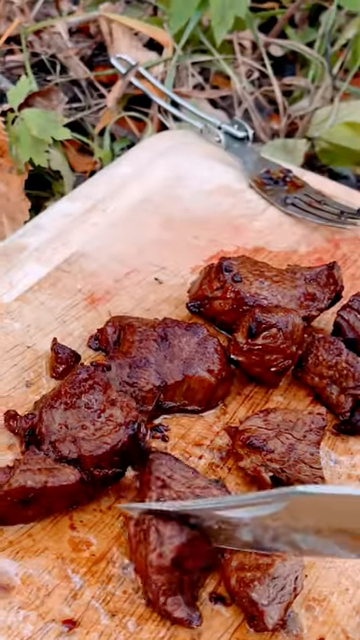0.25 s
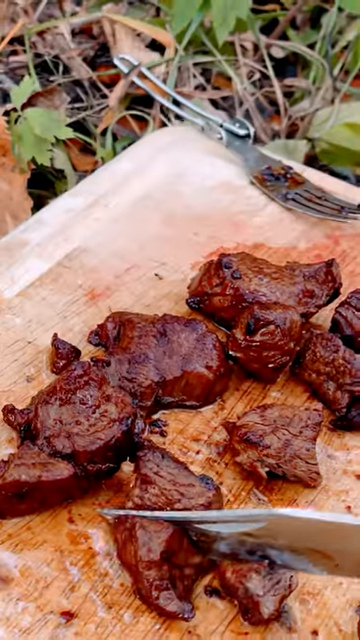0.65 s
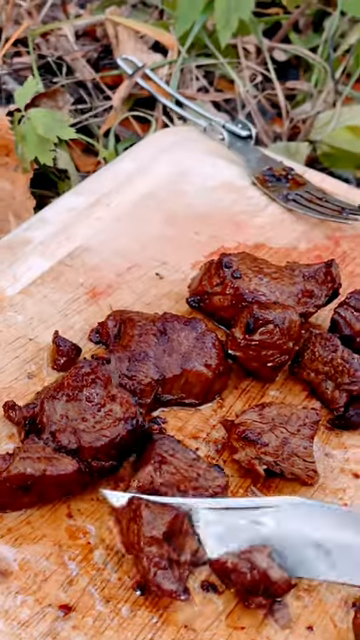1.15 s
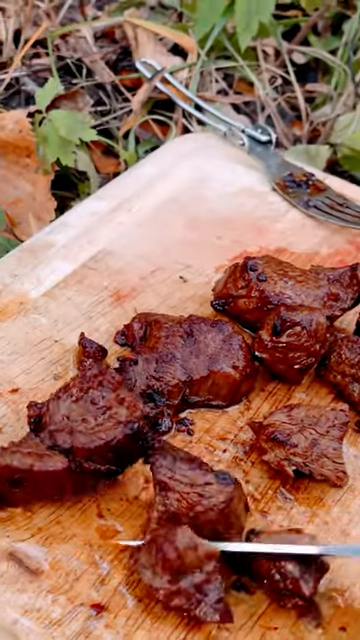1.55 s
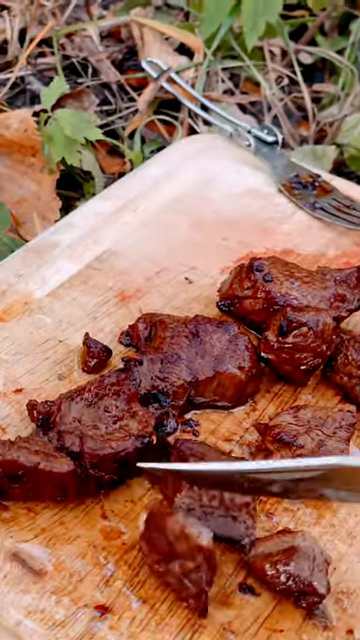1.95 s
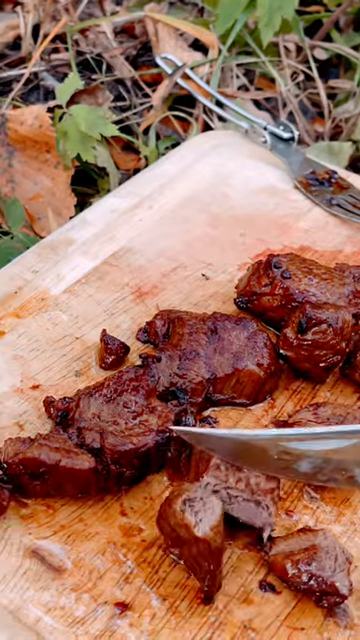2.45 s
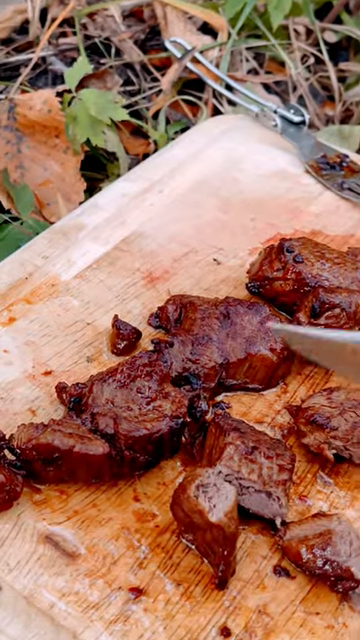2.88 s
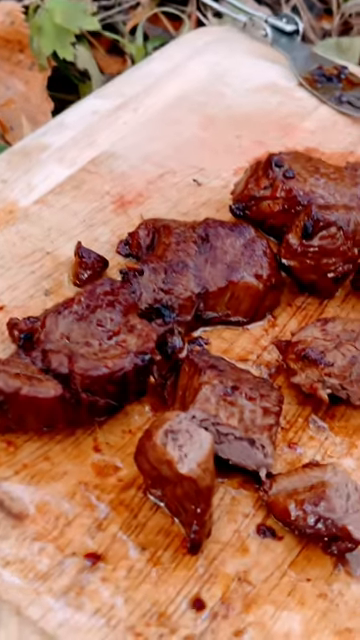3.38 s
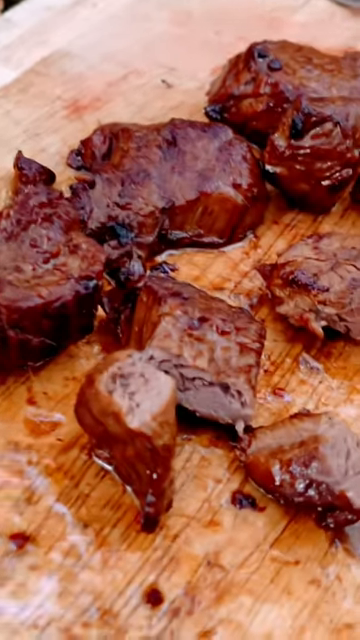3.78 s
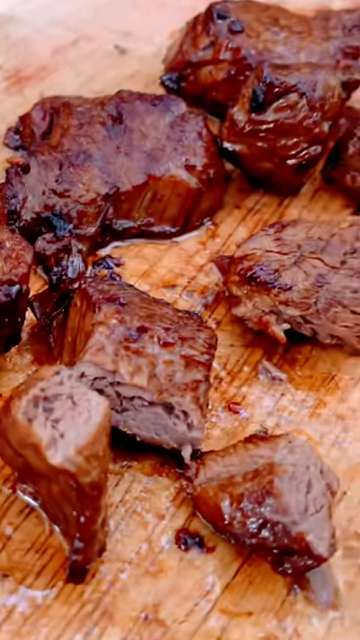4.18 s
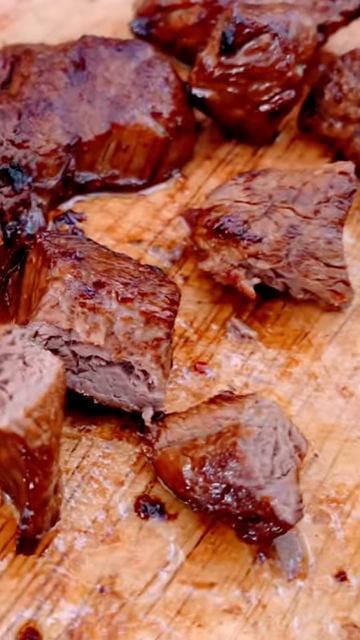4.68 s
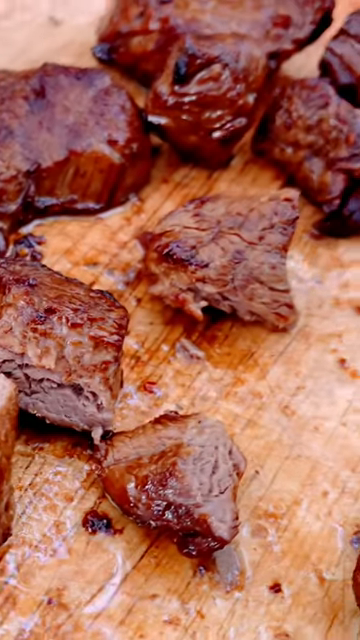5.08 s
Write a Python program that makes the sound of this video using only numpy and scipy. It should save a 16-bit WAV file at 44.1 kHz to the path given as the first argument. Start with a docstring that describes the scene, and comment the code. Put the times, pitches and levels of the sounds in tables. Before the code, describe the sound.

Outdoors, a knife ticks through the crust of fried meat, stutters against a wooden board with a short dull knock, and smears softly through in four even strokes. After a quiet gap, dry leaves slide, then crunch and crackle much louder as someone leans in, with sharp twig snaps to the end. Close stereo microphone, open air, no echo, faint distant motor hum.

```python
"""Outdoors, a knife saws through fried meat on a wooden board in four even strokes: the crust ticks, the blade smears through and knocks on the wood.
Then someone leans in closer: dry leaves rustle, crunch and crackle as the weight grows, and twigs go on snapping while it settles.
A distant motor hums over the faint hiss of the air."""
import sys
import numpy as np
from scipy import signal
from scipy.fft import rfft, irfft, next_fast_len
from scipy.io import wavfile
from scipy.ndimage import uniform_filter1d, map_coordinates

SR = 44100
rng = np.random.default_rng(int(sys.argv[2]) if len(sys.argv) > 2 else 0)


def materialize(psi):
    """Save the field psi as 16-bit PCM at rate SR to the path in sys.argv[1].

    A 1-D psi becomes a single channel; in a 2-D psi each row is a channel.
    """
    bounded = np.clip(np.atleast_2d(psi).T, -1, 1)
    quanta = np.round(bounded * 32767).astype(np.int16)
    wavfile.write(sys.argv[1], SR, quanta)


N = 235185

# blade breaking the crust: (s, peak dB, pitch Hz, low edge Hz)
CRUST_TICKS = [(0.162, -53, 8500, 1490), (0.170, -57.5, 9100, 2500), (0.429, -57, 9000, 2470), (0.514, -53, 5700, 4070), (0.535, -56, 3860, 1300), (0.5433, -48, 7460, 4000),
               (0.623, -64, 8750, 6000), (0.752, -67, 8600, 4480), (0.9586, -47, 6700, 2600), (1.532, -59.5, 3520, 2480), (1.565, -53.5, 4200, 3000), (1.691, -65, 2700, 2400)]
# blade meeting the board: (s, level dB, contact pitch Hz)
KNOCKS = [(0.515, -38.5, 1270), (0.533, -43, 1500), (0.545, -29.5, 670), (0.5506, -38, 2450), (0.5525, -32.5, 714), (0.556, -43, 2270), (0.558, -47, 2370), (0.56, -23.5, 450),
          (0.801, -39.5, 685), (0.810, -45.5, 330), (0.875, -49.5, 2150), (0.9576, -48, 1850), (1.532, -52, 1970), (1.566, -49, 1800), (1.733, -47, 1280)]
# board with the blade on it: (Hz, dB, t60 s)
BOARD = [(221, 4, 0.025), (412, -1.5, 0.044), (530, 4.5, 0.016), (720, -10, 0.027), (887, 1.5, 0.036), (1140, -14, 0.024), (1520, -1.5, 0.015), (1824, -9, 0.038), (2566, -7, 0.062)]
# leaves and twigs snapping, thin ones with no low part: (s, peak dB, pitch Hz, low edge Hz, hollow low ring dB)
SNAPS = [(3.373, -45, 6200, 4600, -75), (3.6828, -27.5, 10600, 4300, -71), (3.715, -32, 5440, 2000, -54), (3.7304, -35, 5640, 1980, -35),
         (3.7737, -28, 6740, 5500, -51), (3.7963, -29, 11000, 7000, -37.5), (3.8093, -26, 7600, 1500, -32), (3.851, -42, 2460, 1200, -39.5), (3.8726, -33.5, 6700, 2500, -57),
         (3.896, -40.5, 4200, 1600, -40), (3.9331, -42, 10700, 1600, -42.5), (3.9519, -38.5, 9700, 1800, -54), (3.9825, -29, 8000, 1800, -30),
         (4.0262, -34.5, 3760, 2980, -60), (4.0617, -33, 5400, 2000, -49), (4.073, -36.5, 3900, 1800, -43.5), (4.1318, -35, 10800, 1500, -43), (4.152, -28, 7500, 1500, -38.5),
         (4.2438, -37, 4800, 2200, -62), (4.2847, -24, 6700, 2800, -43), (4.313, -49, 7400, 1300, -62), (4.334, -33.5, 2850, 2900, -54.5),
         (4.3905, -38.5, 10100, 6000, -72), (4.4324, -44.5, 1550, 1300, -49), (4.4567, -35.5, 11500, 3300, -45), (4.519, -33.5, 6900, 2000, -45.5), (4.612, -42, 4300, 2200, -51.5),
         (4.65, -22.5, 6160, 5230, -41), (4.7097, -46, 11000, 4600, -80), (4.748, -41.5, 5000, 3300, -77), (4.7726, -35.5, 10300, 4170, -74),
         (4.8187, -36.5, 10000, 3500, -73), (4.835, -26, 7900, 5900, -61), (4.8426, -24.5, 11000, 4200, -39), (4.853, -31, 11000, 4500, -70), (4.8662, -25.5, 8000, 5400, -43.5),
         (4.9369, -30.5, 10800, 3850, -45.5), (4.99, -45, 9200, 5400, -73), (4.9989, -35, 7860, 6540, -62), (5.015, -38.5, 11000, 2280, -62), (5.066, -42, 9600, 2800, -56),
         (5.086, -47, 2220, 1700, -60), (5.1135, -39, 3920, 1500, -60), (5.119, -32, 2090, 1470, -46), (5.1419, -20, 7000, 3320, -49), (5.1517, -30, 8440, 3980, -43),
         (5.1696, -25.5, 8200, 1800, -25.5), (5.2138, -38, 7940, 3800, -65), (5.227, -28, 5030, 4550, -47.5), (5.2984, -44.5, 7940, 2800, -52)]
# hollow ring of the leaf bed: (Hz, dB, t60 s)
LEAF_BED = [(396, 0.5, 0.033), (613, 4, 0.06), (892, 13.5, 0.023), (1071, 7.5, 0.037), (1286, 11, 0.029), (2060, -7.5, 0.065)]
# weight pressing on the leaves: (s, dB below the hardest press)
PRESSING = [(3.25, -33.5), (3.45, -29.5), (3.58, -15), (3.67, -8), (3.72, -5), (3.81, -5), (3.885, -15), (3.91, -12), (4.2, -13), (4.29, -8), (4.36, -25), (4.46, -17), (4.512, -22.5), (4.525, -7), (4.57, -24), (5.33, -23.5)]
# colours: (Hz, dB per Hz)
SNAP_COLOUR = [(500, -16), (1500, 3), (2300, -0.5), (3200, -6), (4200, -4), (5200, 0.5), (6800, -1.5), (9000, -1), (9900, -4.5), (10600, 5), (11600, -2.5), (13300, -24), (15000, -26)]
SMEAR_COLOUR = [(300, 5), (900, 9), (2000, 10), (3000, 2), (4000, -5.5), (5500, 3), (8000, -3), (11000, 6.5), (12500, -22), (16000, -103)]
CRACKLE_COLOUR = [(900, 7), (2500, -2.5), (4100, -3), (5200, -0.5), (6800, -3.5), (9000, -0.5), (9900, 0), (10600, 1.5), (11600, 0), (12800, -26), (16000, -72)]
AIR_COLOUR = [(20, -30), (45, -1), (72, 4), (110, 4), (170, -4.5), (260, -7), (450, -20), (1000, -24.5), (1700, -21), (3200, -24), (4100, -17.5), (4800, -23), (5600, -18), (7300, -26), (9500, -25.5), (10200, -55), (12000, -36.5), (16000, -90)]
# distant motor: (Hz, dB)
HUM = [(130, -60), (260.5, -77.5)]
CUTOFF_HZ = 16500  # fixed
TIME = np.arange(N) / SR
CRUNCH_COLOUR = [(200, 2), (400, -12), (600, -3.5), (920, 5), (1300, 0), (1700, -23.5), (4000, -26)]
# sound from the ground bends round the recorder: (Hz, radians by which the left port lags)
PORT_PHASE = [(260, 0.37), (520, 2.06), (860, 2.38), (1380, 2.95), (2150, 5.08), (3360, 4.17), (4300, 7.75), (6600, 11.77), (8000, 20.46), (8900, 20), (10500, 21.77), (11700, 25), (12700, 25.3)]
# leaves rubbing: (Hz, width Hz, dB)
RUBBING = [(1284, 180, 1.5), (1790, 870, 5.5), (2800, 1050, 4.5), (4200, 3400, 3.5)]
# tiny flakes of crust: how many, peak and pitch (lowest, highest)
CRUMB_COUNT, CRUMB_DB, CRUMB_HZ = 60, (-72, -62), (2800, 11000)  # fixed
# the blade saws to and fro at an even pace; each stroke swells to its middle and fades
FIRST_STROKE_S, STROKE_PERIOD_S, STROKE_FADE_DB_PER_S = 0.554, 0.324, 65
STROKE_DB = [-50, -50.5, -53, -52]  # level at the middle of each stroke
BLADE_IN_S, BLADE_OUT_S, DRAG_DB = 0.59, 1.75, -66  # light steady drag while the blade is in the meat
SNAP_RISE_S, SNAP_DECAY_S, SNAP_TAIL_DB = 0.0007, 0.001, -17  # fixed
# lesser snaps come at random once the weight is down, with peak and pitch in a range (lowest, highest)
SMALL_SNAPS_FROM_S, SMALL_SNAPS_PER_S = 3.7, 55  # fixed
SMALL_SNAP_DB, SMALL_SNAP_HZ = (-61.5, -31), (1800, 11000)  # at the hardest press
SMALL_SNAP_FOLLOWS = 0.36  # dB gained per dB of weight
SMALL_LOW_EDGE = 0.4  # their low edge, as a share of the pitch
SMALL_HOLLOW_DB = -20.5  # their hollow ring, relative to the crack
WEIGHT_DOWN_S = 3.6
# each sound of the leaves: (level at the hardest press dB, dB gained per dB of weight); rubbing needs the least weight
CRUNCH_LAW, RUSTLE_LAW, CRACKLE_LAW = (-56.5, 1), (-46.5, 0.97), (-37, 0.98)
# loose leaves slide before they are pinned down: (middle s, half length s, level dB)
SLIDE_S, SLIDE_WIDTH_S, SLIDE_DB = 3.508, 0.15, -55.5
# tough fibres catching on the blade: (middle s, half length s, level dB)
RASPS = [(0.875, 0.011, -59.5), (1.063, 0.014, -61.5), (1.144, 0.03, -61), (1.229, 0.026, -51), (1.29, 0.017, -61)]
# ring of those catches: (Hz, width Hz, dB)
RASP_RING = [(5400, 1050, 2.5), (7040, 600, 1), (9200, 770, 3), (11000, 300, 0)]
# thin whistle, perhaps a small bird: (middle s, half length s, pitch Hz, fall Hz per s, peak dB)
WHISTLE = (5.096, 0.016, 8800, 32000, -54)  # fixed


def from_db(db):
    """Decibels to gain."""
    return 10 ** (np.asarray(db) / 20)


def rms_one(x):
    """Scale to unit power."""
    return x / np.sqrt(np.mean(x ** 2) + 1e-20)




def drift(rate):
    """Slow chance with spread 1."""
    knots = rng.standard_normal(4000)
    return np.interp(TIME * rate, np.arange(len(knots)), knots)


def colour(x, points):
    """Causal (minimum-phase) filter that follows a spectrum, with unit gain for white noise."""
    size = 2 * next_fast_len(N // 2 + 4096)  # fixed
    hz, db = np.transpose(points)
    gain = rms_one(from_db(np.interp(np.log(np.fft.rfftfreq(size, 1 / SR) + 1), np.log(hz), db)))
    cepstrum = irfft(np.log(gain))
    cepstrum[1:size // 2] *= 2
    cepstrum[size // 2 + 1:] = 0
    return irfft(rfft(x, size) * np.exp(rfft(cepstrum)))[..., :N]


def resonate(x, hz, width_hz):
    """One resonance with gain 1 on top."""
    r = np.exp(-np.pi * width_hz / SR)
    return signal.lfilter(np.array([1, 0, -1]) * (1 - r * r) / 2, [1, -2 * r * np.cos(2 * np.pi * hz / SR), r * r], x + 1e-18)


def add(out, s, sound):
    """Mix a sound in at a time."""
    i = int(s * SR)
    out[..., i:i + sound.shape[-1]] += sound[..., :N - i]


def two_ports(x, lag_ms, pan_db):
    """Sound reaches the right port first and the left one a little later."""
    left, right = np.broadcast_to(x, (2, N))
    late = map_coordinates(left, [np.arange(N) - lag_ms * SR / 1000], order=3)  # fixed
    return np.array([late * from_db(pan_db / 2), right * from_db(-pan_db / 2)])


def pair(alike, size):
    """Two white noises with a shared part."""
    mid, side = rng.standard_normal((2, size))
    alike = np.clip(alike, 0, 1)
    return (np.sqrt(1 + alike) * mid + np.sqrt(1 - alike) * side * [[1], [-1]]) / np.sqrt(2)


def fracture(hz, edge_hz, peak_s, rise_s, decay_s, tail_db, tail_s, ring_db, width_hz):
    """A crack gathers in uneven slips, peaks, rings the broken piece and scatters off things nearby."""
    t = TIME[:2048] - peak_s
    after = np.maximum(t, 0)
    shape = np.exp(np.minimum(t, 0) / rise_s) * (np.exp(-after / decay_s) + from_db(tail_db) * np.exp(-after / tail_s))
    slips = from_db(2.5 * rng.standard_normal(len(t)))  # fixed
    burst = pair(.85, len(t)) * slips * shape  # fixed
    # each piece has a main mode and two weaker ones of its own
    others = np.minimum(hz * rng.uniform([.6, 1.1], [.85, 1.5]), 11500)  # fixed
    ring = resonate(burst, hz, width_hz) + .6 * sum(resonate(burst, f, width_hz) for f in others)  # fixed
    burst = signal.lfilter(*signal.butter(1, min(2 * hz, SR / 2.3), fs=SR), burst + from_db(ring_db) * ring)  # thick pieces break duller
    burst = signal.lfilter(*signal.butter(2, min(edge_hz, SR / 4), "high", fs=SR), burst)  # small ones radiate no lows
    return burst / np.sqrt(np.mean(burst ** 2) * t[-1] / decay_s)


def strike(modes, contact_hz, reach_octaves, detune, sag):
    """Damped modes of height about 1; those near the contact pitch are driven most, and start sharp while pressed."""
    t = TIME[:4096]
    hz, db, t60 = np.transpose(modes)[:, :, None]
    chance = rng.standard_normal((2, len(modes), 1))
    gain = from_db(db + 2 * chance[0]) / (1 + (np.log2(hz / contact_hz) / reach_octaves) ** 2)
    gain[::2] *= -1  # neighbouring modes swing against each other and merge into one thump
    turns = hz * (1 + detune * chance[1]) * np.cumsum(1 + sag * np.exp(-t / .003)) / SR  # fixed
    ring = np.sum(gain / np.linalg.norm(gain) * np.sin(2 * np.pi * turns) * np.exp(-np.log(1000) * t / t60), axis=0)
    ring = ring * (1 - np.exp(-2 * contact_hz * t))  # the contact takes half a cycle to build
    return signal.lfilter(*signal.butter(2, contact_hz / 2, "high", fs=SR), ring)


def grains(per_s, spread_db, low_hz, high_hz, sharpness):
    """Many tiny breaks of uneven size, each ringing briefly at a pitch of its own."""
    sizes = from_db(spread_db * np.minimum(rng.exponential(1, N), 4)) * rng.choice([-1, 1], N)
    clicks = sizes * (rng.random(N) < per_s * from_db(3 * drift(40)) / SR)
    dealt = rng.integers(0, 16, N)  # fixed
    pitches = np.geomspace(low_hz, min(high_hz, SR / 3), 16)  # fixed
    return rms_one(sum(resonate(clicks * (dealt == k), hz, hz / sharpness) for k, hz in enumerate(pitches)))


def knife():
    """The crust ticks and the wet fibres smear along the blade in small catches."""
    ticks = np.zeros((2, N))
    for s, db, hz, edge_hz in CRUST_TICKS + crumbs():
        tick = fracture(hz, edge_hz, peak_s=.001, rise_s=.0005, decay_s=.001, tail_db=-20, tail_s=.006, ring_db=12, width_hz=700)  # fixed
        add(ticks, s, from_db(db + 11) * tick)
    stroke = sawing() * from_db(2 * drift(60))  # fixed
    catches = grains(per_s=1200, spread_db=3.5, low_hz=4800, high_hz=10000, sharpness=10)  # fixed
    squelch = grains(per_s=350, spread_db=3, low_hz=800, high_hz=3500, sharpness=6)  # fixed
    smear = from_db(-9.0) * stroke * (catches + from_db(-11.0) * squelch + from_db(-1.0) * pair(0.15, N))
    return two_ports(colour(ticks + from_db(-3.5) * smear, SMEAR_COLOUR) + rasps(), lag_ms=0.2474, pan_db=3.0)


def board():
    """The blade breaks through and stutters on the wood; each contact is a gritty scuff and a short ring."""
    out = np.zeros(N)
    for s, db, contact_hz in KNOCKS:
        scuff = through(rng.standard_normal(4096), [(contact_hz, contact_hz * .45, 0)]) * np.exp(-TIME[:4096] / .003)  # fixed
        add(out, s, from_db(db - 2.5) * (strike(BOARD, contact_hz, reach_octaves=0.82, detune=0.042, sag=0.055) + .5 * scuff))
    return two_ports(out, lag_ms=0.061, pan_db=3.0)


def snaps():
    """Stiff leaves and twigs give way; the leaf bed answers with a short hollow ring."""
    cracks, hollow = np.zeros((2, N)), np.zeros(N)
    for s, db, hz, edge_hz, hollow_db in SNAPS + small_snaps():
        crack = fracture(hz, edge_hz, peak_s=0.0011, rise_s=SNAP_RISE_S, decay_s=SNAP_DECAY_S, tail_db=SNAP_TAIL_DB, tail_s=0.0066, ring_db=7.0, width_hz=140)
        add(cracks, s, from_db(db) * crack)
        add(hollow, s + 0.0011, from_db(hollow_db + 10.5) * strike(LEAF_BED, contact_hz=890, reach_octaves=1.0, detune=0.039, sag=0.11))
    return from_ground(colour(cracks, SNAP_COLOUR), pan_db=0.4) + from_ground(hollow, pan_db=-4.0)


def leaves():
    """Countless small breaks in clumps: a hollow crunch below, leaves rubbing, and fine crackle on top."""
    pinned = np.clip((TIME - SLIDE_S) / (WEIGHT_DOWN_S - SLIDE_S), 0, 1)  # sliding leaves do not crunch yet
    crunch_gain, crackle_gain = under_weight(CRUNCH_LAW) * pinned * clumps(), under_weight(CRACKLE_LAW) * clumps()
    rustle_gain = under_weight(RUSTLE_LAW) + from_db(SLIDE_DB) * np.exp(-((TIME - SLIDE_S) / SLIDE_WIDTH_S) ** 2)
    crunch = 1.25 * grains(per_s=260, spread_db=3, low_hz=480, high_hz=1400, sharpness=12) + .4 * pair(.5, N)  # fixed
    rub = .8 * grains(per_s=700, spread_db=3, low_hz=1200, high_hz=4500, sharpness=16) + .75 * pair(.2, N)  # fixed
    fine = .9 * grains(per_s=1400, spread_db=3, low_hz=2600, high_hz=12000, sharpness=20) + .55 * pair(.3, N)  # fixed
    dull = crunch_gain * from_db(3.5) * colour(crunch, CRUNCH_COLOUR)
    around = two_ports(rustle_gain * through(rub, RUBBING), lag_ms=0.11, pan_db=1.0)  # the rubbing comes from all round
    bright = crackle_gain * colour(fine, CRACKLE_COLOUR)
    return around + from_ground(dull, pan_db=-5.0) + from_ground(bright, pan_db=-0.5)


def outdoors():
    """Low rumble alike at both ports, thin hiss unlike, and a wavering far motor."""
    lows = signal.sosfilt(signal.butter(2, 350, fs=SR, output="sos"), pair(.88, N))  # fixed
    highs = signal.sosfilt(signal.butter(2, 350, "high", fs=SR, output="sos"), pair(0.015, N))
    air = from_db(-60.5) * colour(lows + highs, AIR_COLOUR)
    turns = np.cumsum(1 + 0.0056 * drift(5.0)) / SR
    hum = sum(from_db(db + 1.84 * drift(14)) * np.sqrt(2) * np.sin(2 * np.pi * hz * turns) for hz, db in HUM)
    return air + two_ports(hum, lag_ms=0.51, pan_db=1.0)


def from_ground(x, pan_db):
    """Off to one side, each pitch reaches the two ports with its own phase."""
    size = 2 * next_fast_len(N // 2 + 4096)  # fixed
    left, right = np.broadcast_to(x, (2, N))
    phase = np.interp(np.fft.rfftfreq(size, 1 / SR), *np.transpose(PORT_PHASE))
    late = irfft(rfft(left, size) * np.exp(-1j * phase))[:N]
    return np.array([late * from_db(pan_db / 2), right * from_db(-pan_db / 2)])


def sawing():
    """Gain of the blade's rub: even strokes over a light drag."""
    middles = FIRST_STROKE_S + STROKE_PERIOD_S * np.arange(len(STROKE_DB))
    strokes = sum(from_db(db - STROKE_FADE_DB_PER_S * np.abs(TIME - s)) ** 2 for s, db in zip(middles, STROKE_DB))
    in_meat = uniform_filter1d(1.0 * ((TIME > BLADE_IN_S) & (TIME < BLADE_OUT_S)), size=4096)
    return np.sqrt(strokes + (from_db(DRAG_DB) * in_meat) ** 2)


def under_weight(law):
    """Gain of a sound that grows with the weight on the leaves."""
    full_db, follows = law
    return from_db(full_db + follows * np.interp(TIME, *np.transpose(PRESSING))) * np.clip((TIME - PRESSING[0][0]) * 10 + 1, 0, 1)


def small_snaps():
    """Lesser snaps at random moments and pitches, louder under more weight, each with a faint hollow ring."""
    low, high = np.transpose([(SMALL_SNAPS_FROM_S, TIME[-1]), SMALL_SNAP_DB, SMALL_SNAP_HZ])
    s, db, hz = (low + (high - low) * rng.random((int(SMALL_SNAPS_PER_S * (TIME[-1] - SMALL_SNAPS_FROM_S)), 3))).T
    db = db + SMALL_SNAP_FOLLOWS * np.interp(s, *np.transpose(PRESSING))
    return list(zip(s, db, hz, SMALL_LOW_EDGE * hz, db + SMALL_HOLLOW_DB))


def rasps():
    """A tough fibre holds the blade, then lets go in a short flutter of slips."""
    gain = sum(from_db(db) * np.exp(-((TIME - s) / half_s) ** 2) for s, half_s, db in RASPS)
    slips = pair(.7, N) * from_db(5 * drift(300))  # fixed
    return gain * through(slips, RASP_RING)


def through(x, resonances):
    """Steep-sided resonances side by side, at unit power."""
    return rms_one(sum(from_db(db) * resonate(resonate(x, hz, width_hz), hz, width_hz) for hz, width_hz, db in resonances))


def crumbs():
    """Tiny flakes of crust break at random while the blade is in the meat."""
    low, high = np.transpose([(BLADE_IN_S, BLADE_OUT_S), CRUMB_DB, CRUMB_HZ])
    return [(s, db, hz, SMALL_LOW_EDGE * hz) for s, db, hz in low + (high - low) * rng.random((CRUMB_COUNT, 3))]


def whistle():
    """A thin, high note swells and falls."""
    s, half_s, hz, fall_hz_per_s, db = WHISTLE
    t = TIME - s
    return from_db(db) * np.exp(-(t / half_s) ** 2) * np.sin(2 * np.pi * t * (hz - fall_hz_per_s * t / 2))


def clumps():
    """Gain of breaks that bunch together, in quick flurries within slower surges."""
    return rms_one(from_db(1.8 * drift(120) + 1.8 * drift(45)))  # fixed


def scene():
    """Everything is close by, in the open air."""
    return knife() + board() + snaps() + leaves() + whistle() + outdoors()


def record(dry):
    """The top is cut steeply."""
    return signal.sosfilt(signal.ellip(10, .1, 80, CUTOFF_HZ, fs=SR, output="sos"), dry)  # fixed


dry = scene()
out = record(dry)
materialize(out)
```